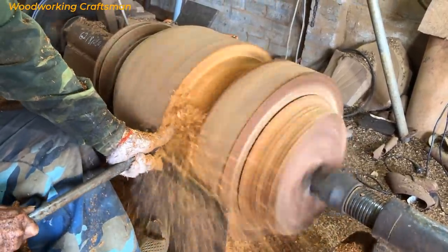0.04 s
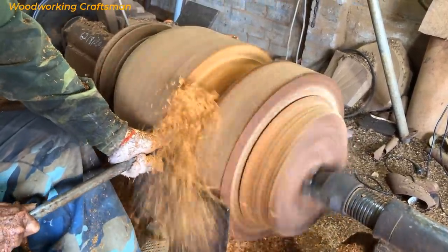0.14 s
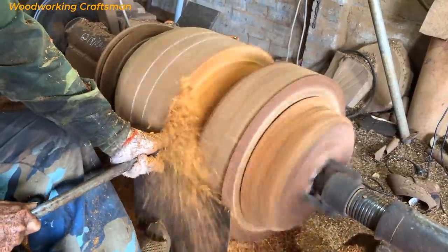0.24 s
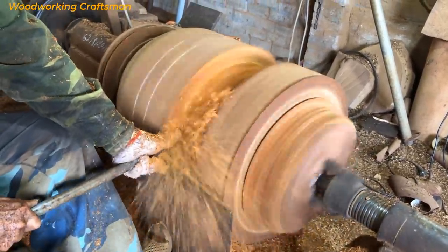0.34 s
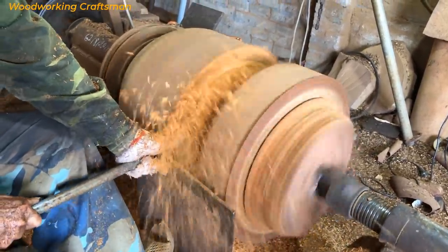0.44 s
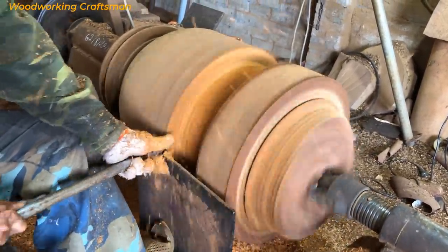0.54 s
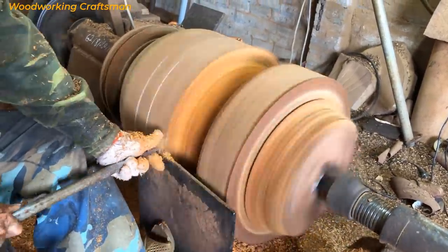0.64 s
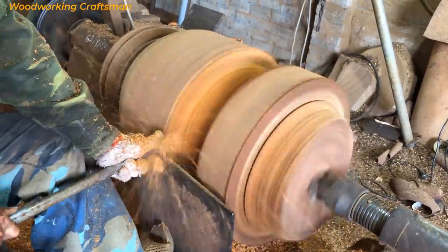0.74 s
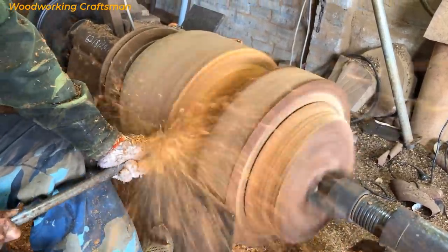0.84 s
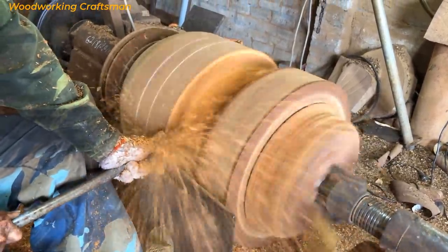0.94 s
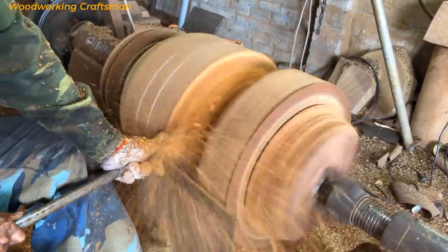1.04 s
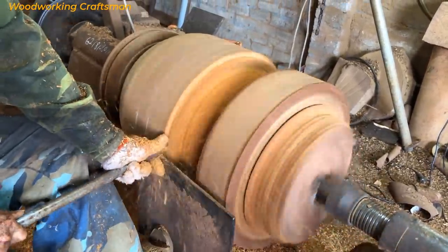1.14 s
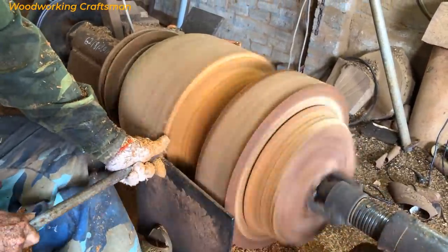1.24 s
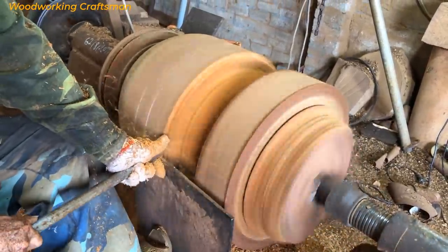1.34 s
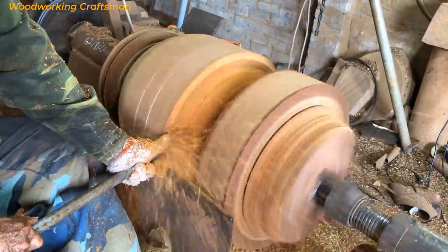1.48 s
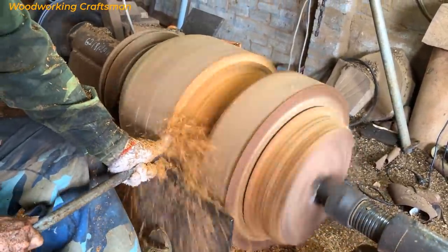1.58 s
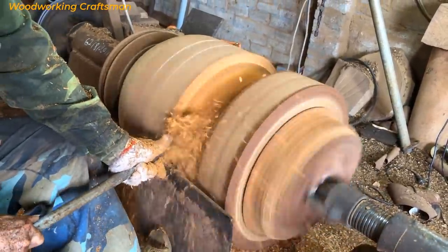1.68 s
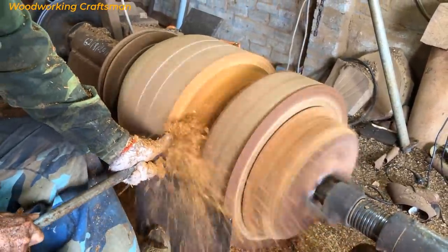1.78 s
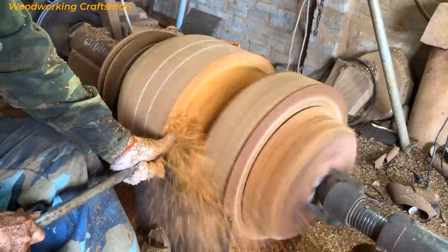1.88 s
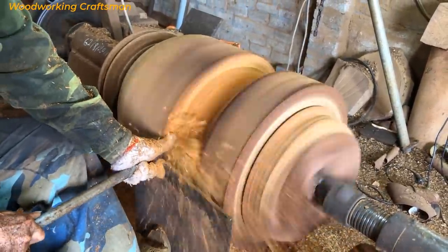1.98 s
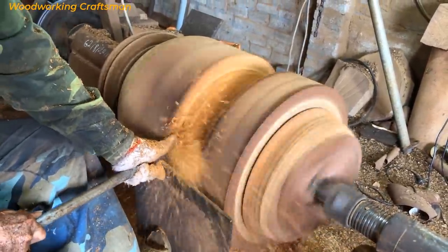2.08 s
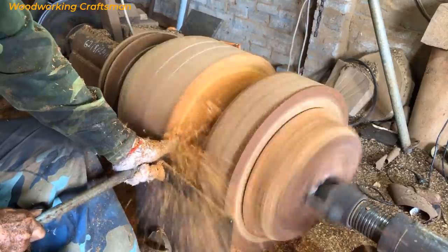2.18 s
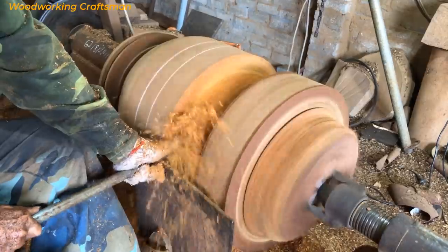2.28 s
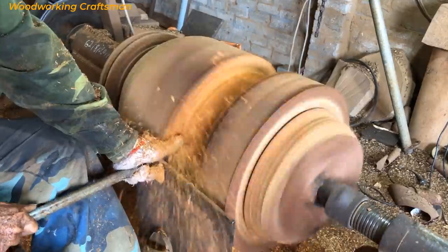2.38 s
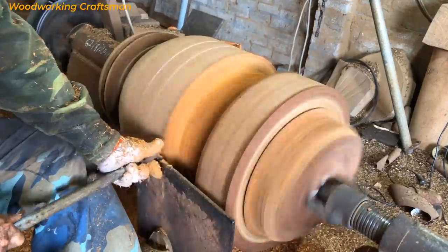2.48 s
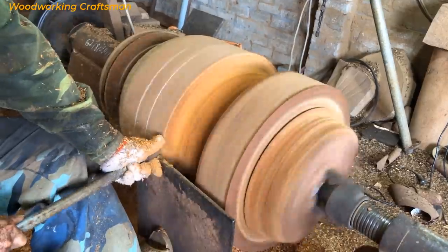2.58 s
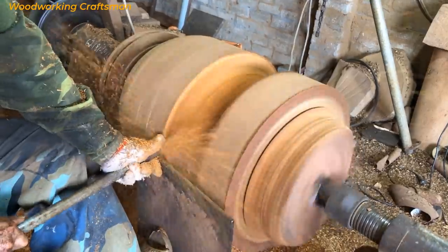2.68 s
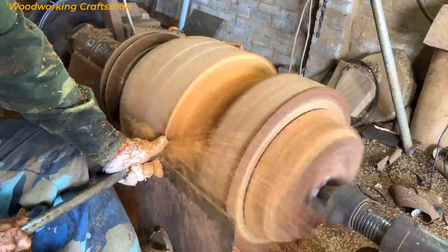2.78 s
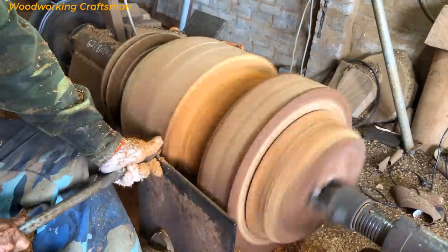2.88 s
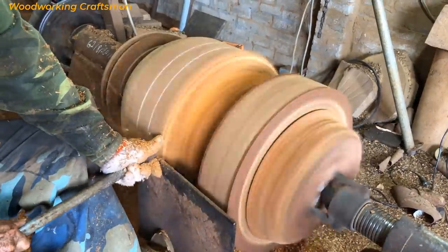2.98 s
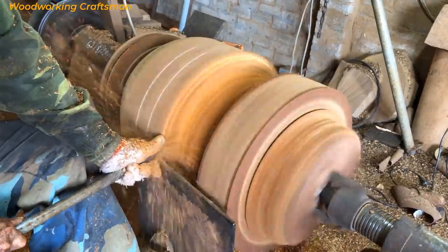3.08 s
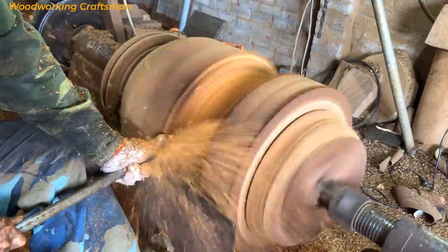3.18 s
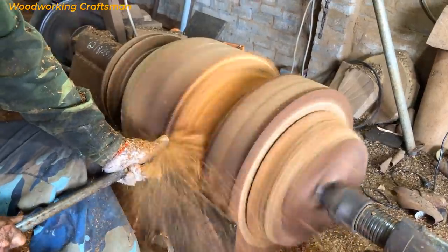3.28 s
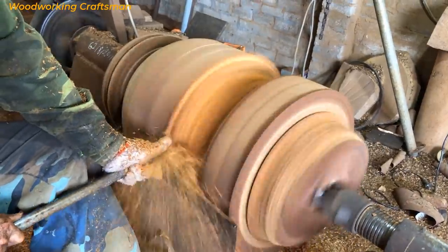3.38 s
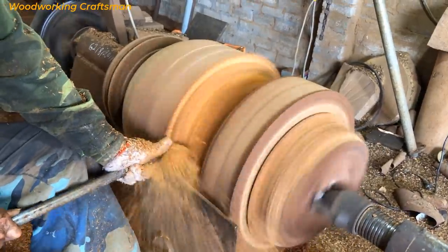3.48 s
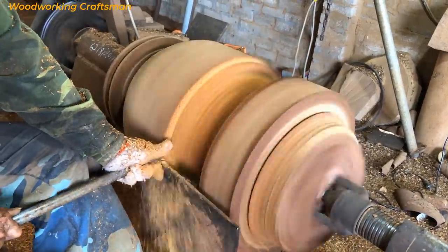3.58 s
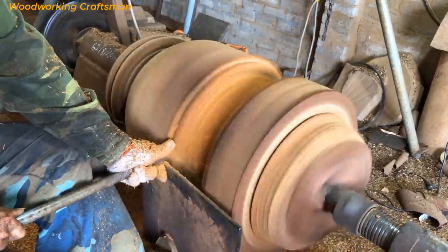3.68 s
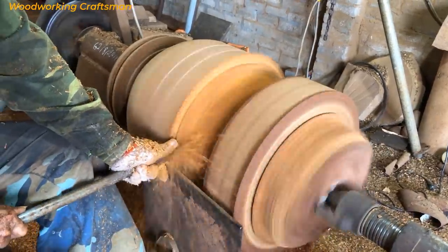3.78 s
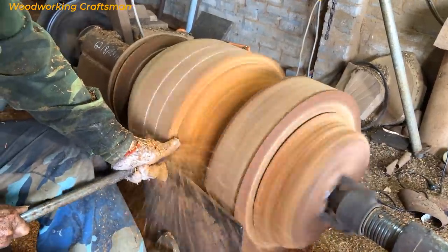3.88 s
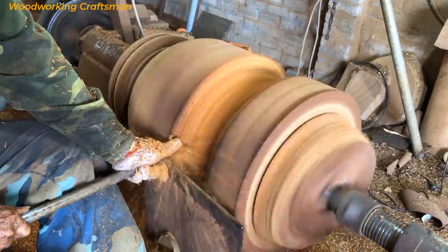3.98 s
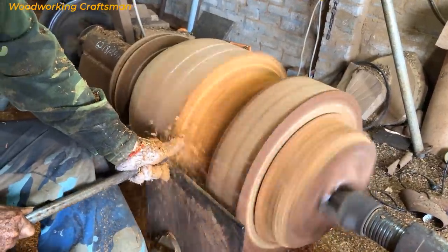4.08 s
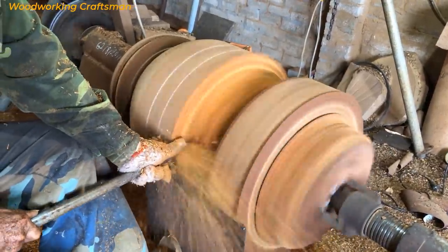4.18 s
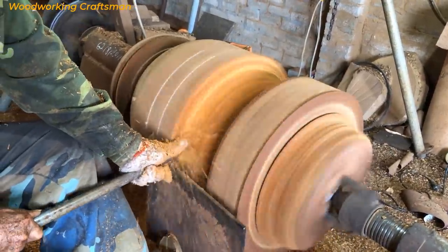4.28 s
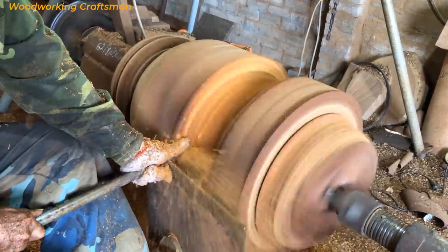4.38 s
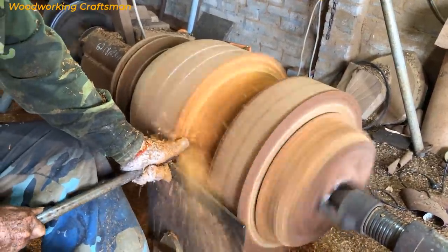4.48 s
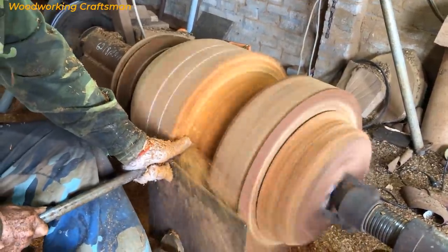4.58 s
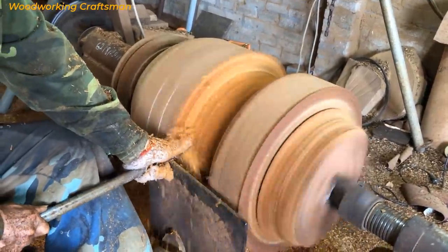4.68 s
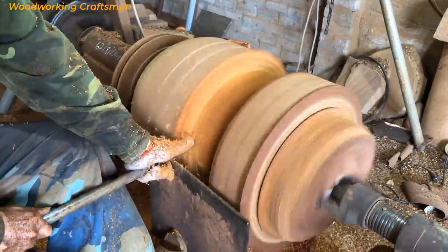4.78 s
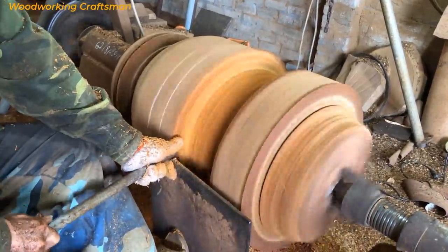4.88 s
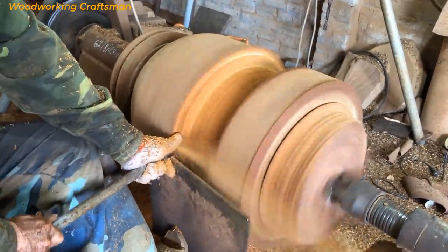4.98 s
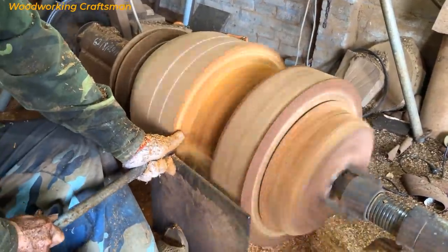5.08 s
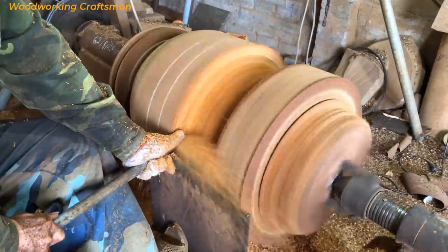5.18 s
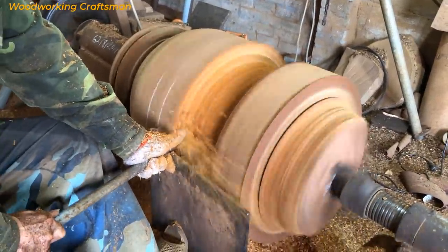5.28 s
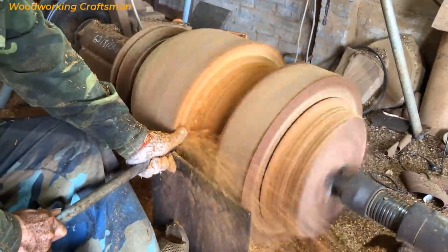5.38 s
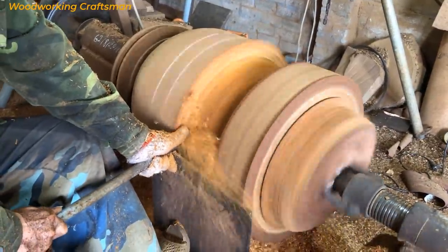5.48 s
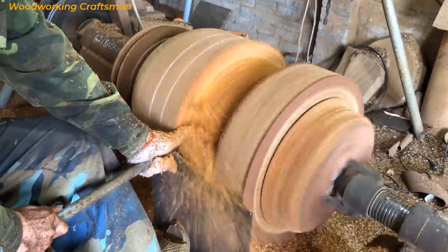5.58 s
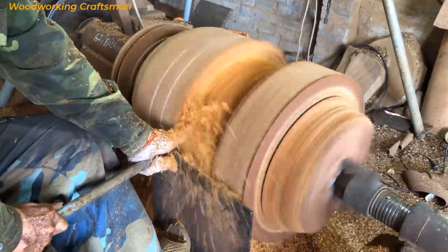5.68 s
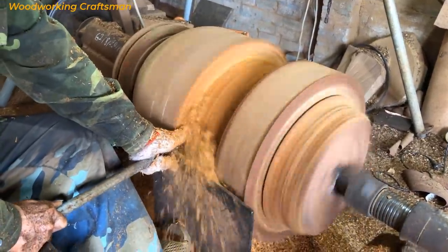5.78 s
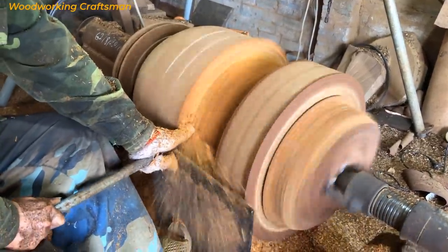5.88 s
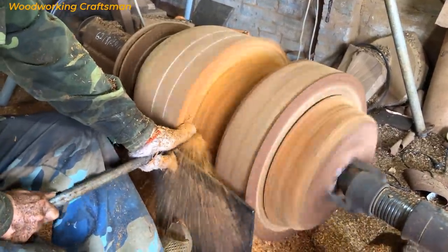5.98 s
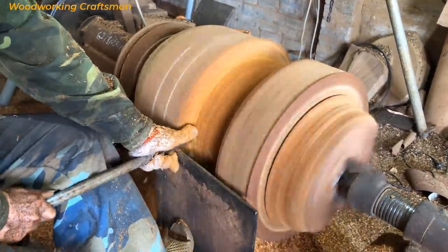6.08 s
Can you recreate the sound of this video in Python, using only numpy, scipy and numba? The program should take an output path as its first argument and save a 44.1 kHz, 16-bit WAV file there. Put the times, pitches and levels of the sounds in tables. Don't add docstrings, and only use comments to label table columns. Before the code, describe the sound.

Seven harsh scraping passes of a hand-held turning tool on rotating wood, metallic edged, with low drive hum and wind buffets on the microphone.

```python
import sys
import numpy as np
from scipy import signal
from scipy.fft import rfft, irfft, next_fast_len
from scipy.io import wavfile
from scipy.ndimage import uniform_filter1d
from numba import njit

SR = 44100
rng = np.random.default_rng(int(sys.argv[2]) if len(sys.argv) > 2 else 0)


def volts(x):
    e = np.asarray(x, float) / 20
    return 10 ** e


def store_wav(level_fs):
    pcm = np.round(np.clip(np.atleast_2d(level_fs), -1, 1) * 32767)
    wavfile.write(sys.argv[1], SR, pcm.T.astype(np.int16))


N = 270774
SKIM_HZ = 12710

# (edge touches [s], entry length [s], starts to lift [s], exit length [s], firmness on the rest [dB])
PASSES = [
    (-.1, .01, .576, .014, 1),
    (.714, .007, 1.179, .055, 0.5),
    (1.323, 0.0083, 2.439, .032, 0),
    (2.612, 0.051, 2.887, 0.05, -0.5),
    (2.957, 0.0046, 3.614, 0.021, 1),
    (3.728, 0.007, 4.835, .034, -3),
    (5.004, 0.047, 6.11, .05, -0.44),
]
# (time [s], level [dB])
BREEZE = [(0, -48), (.3, -46), (.42, -55), (.78, -51), (.86, -39.5), (1.75, -39), (2.3, -46), (2.64, -51),
          (2.72, -44), (3.18, -39.5), (3.29, -53), (3.4, -40.5), (4.46, -47.5), (4.6, -74), (4.7, -48.5),
          (5.2, -44.5), (5.4, -58.5), (5.9, -41.5)]


def level(x, db):
    return x * volts(db) / np.sqrt(np.mean(x ** 2))


@njit
def svf(x, hz, width):
    y, b, l = np.empty(len(x)), 0., 0.
    for i in range(len(x)):
        g, k = np.tan(np.pi * hz[i] / SR), width[i] / hz[i]
        v = (b + g * (x[i] - l)) / (1 + g * (g + k))
        b, l, y[i] = 2 * v - b, l + 2 * g * v, k * v
    return y


def band(x, hz, width):
    hz = np.clip(hz + np.zeros(N), 30, .45 * SR)
    width = width + np.zeros(N)
    return svf(svf(x, hz, width), hz, width)


def walk(rate):
    hold = int(SR / rate)
    steps = np.repeat(rng.standard_normal(N // hold + 1), hold)
    return 1.46 * uniform_filter1d(uniform_filter1d(steps, hold), hold)[:N]


def shape(x, response):
    size = next_fast_len(N + SR)
    hz = np.arange(size // 2 + 1) * SR / size
    return irfft(rfft(x, size) * response(hz), size)[:N]


def hand(t):
    # (time [s], force [dB], tearing pitch [Hz], fineness [dB])
    plunges = [
        [(0, -15.5, 11000, -13), (.348, -18, 9860, -13.5), (.576, -21.5, 10640, -1)],
        [(1.328, -19.5, 12700, -9), (1.476, -20.5, 12900, -12), (1.68, -16, 12600, -10),
         (1.928, -16, 10500, -11), (2.16, -18, 10000, -14), (2.422, -21.5, 10600, -4), (2.455, -22, 10500, -4)],
        [(3.736, -17.5, 13050, -24), (3.82, -20, 12420, -19), (3.972, -18.5, 12300, 3.5),
         (4.282, -16.5, 11330, -6.5), (4.58, -23, 10300, -2), (4.82, -23, 11200, -5)],
        [(5.056, -24, 12450, -2), (5.236, -19.5, 12430, 2), (5.626, -16, 10100, -9.5),
         (5.83, -20.5, 9900, -10.5), (6.065, -27.5, 10140, -3), (6.1, -19.5, 12300, -14),
         (6.14, -23, 11200, -13)],
    ]
    # (time [s], force [dB], fineness [dB])
    skims = [
        [(.72, -34, -11), (.86, -22, -14), (1.184, -22.5, -12)],
        [(2.668, -26, -15), (2.8, -22, -10), (2.862, -25.5, -10), (2.875, -31.5, -12)],
        [(2.962, -34, -7), (3.002, -19.5, -14), (3.36, -20.5, -11), (3.614, -20.5, -2)],
    ]
    skim_rows = [[(s, db, SKIM_HZ, fine) for s, db, fine in skim] for skim in skims]
    s, *columns = np.transpose(np.concatenate(sorted(plunges + skim_rows)))
    return [np.interp(t, s, column) for column in columns]


def contact(t):
    rows = np.transpose(PASSES)
    touch, entry, lift, leave, firm_db = rows[:, np.searchsorted(rows[0], t) - 1]
    entering_db = -21 * np.clip(1 - (t - touch) / entry, 0, 1)
    gone = np.clip((t - lift) / leave, 0, None)
    lifting_db = -22 * np.minimum(gone, 1) ** 1.26 - 36 * np.clip(gone - 1, 0, 4)
    settling_db = -2.5 * np.exp(-(t - touch) / 0.058)
    return entering_db + lifting_db, firm_db + settling_db


def chatter_db(t):
    # (starts [s], full [s], rate [Hz], depth [dB], time of a crest [s])
    lobes = [
        (0, .3, 19.4, 1.5, .419),
        (.8, .9, 32.9, 1.6, 1.005),
        (.8, .9, 19.6, .9, .983),
        (1.85, 2.25, 19.7, 2.5, 2.265),
        (4.05, 4.45, 33.1, 2.5, 4.574),
        (4.2, 4.6, 19.8, 2.3, 4.703),
        (5.5, 5.85, 19.6, 2.6, 5.947),
    ]
    touches = np.transpose(PASSES)[0]
    total_db = np.zeros(N)
    for start, full, hz, db, crest in lobes:
        same_pass = np.searchsorted(touches, t) == np.searchsorted(touches, start)
        depth = db * np.interp(t, [start, full], [0, 1]) * same_pass
        angle = 2 * np.pi * hz * (t - crest)
        total_db += depth * (np.cos(angle) - 0.21 * np.cos(2 * angle))
    return total_db


def skips_db(t):
    # (time [s], force change [dB], length [ms])
    skips = [(.722, 7, 3.6), (.75, 0, 10), (.818, 6.5, 6.2), (1.238, 11, 4), (1.332, 3.5, 2.7),
             (1.344, -17, 6.9), (1.365, -5.5, 6.8), (2.415, -1, 5.3), (2.618, 9, 4.9), (2.665, 4, 5.4),
             (3.657, 4, 3.4), (3.72, 16, 4.4), (3.735, 1, 2.8), (3.742, -13, 6.1), (3.776, -3, 5.1),
             (4.768, -1.5, 11), (5.017, -6, 3.6), (5.028, 3.5, 4.5), (5.045, -18, 5.1), (5.075, -14, 3.6)]
    return sum(db * np.exp(-((t - at) * 1000 / ms) ** 2) for at, db, ms in skips)


def fibres(scatter_db, flicker_db):
    uneven = np.minimum(rng.exponential(size=N), 5)
    sizes = volts(scatter_db * uneven + flicker_db * walk(90))
    return level(rng.standard_normal(N) * sizes, 0)


def tearing(hz, deep, heavy):
    breaks = fibres(scatter_db=4.0, flicker_db=0.25)
    pitched = band(breaks, hz * (1 + 0.008 * walk(14)), 3300 - 900 * heavy)
    hiss = band(breaks, 11300 - 900 * deep, 5600)
    return level(pitched, -6.0) + volts(-2.8 * deep) * level(hiss, -7.5)


def shank_ring(load):
    breaks = fibres(scatter_db=5.0, flicker_db=0.96)
    return level(band(breaks, 7550 - 900 * load, 1080), -7)


def rest_ring(load, heavy):
    rub = fibres(scatter_db=4.0, flicker_db=1.13)
    light = band(rub, 3680, 1040) + 1.17 * band(rub, 5210, 1980) + 0.34 * band(rub, 4390, 3900)
    middle = band(rub, 4430, 1400)
    ring = (1 - 0.59 * load) * light + (0.15 + 0.71 * heavy + 1.35 * load) * middle
    ring = volts(-5) * ring / np.sqrt(uniform_filter1d(ring ** 2, size=4000))
    thud = level(band(fibres(scatter_db=0.0, flicker_db=-1.0), 1730, 1470), -20.0)
    return ring + thud


def shaving_dust(deep):
    breaks = fibres(scatter_db=4.0, flicker_db=0.2)
    return level(band(breaks, 15300 - 650 * deep + 120 * walk(3), 3600 + 1200 * deep), -2.6)


def tool(f):
    # (frequency [Hz], width [Hz], level over the bare tearing [dB])
    modes = [(1395, 73, 15), (1750, 67, 11), (1980, 81, 11.5), (2820, 37, 8), (3420, 73, 7.5),
             (4090, 235, 12), (4347, 50, 9), (5264, 87, 7.5), (6080, 67, 7), (6760, 240, 7),
             (7160, 210, 8.5), (7360, 60, 7.5), (8240, 84, 8.5), (9150, 300, 5), (9510, 220, 5.5),
             (8960, 150, 2), (10240, 120, -14), (11200, 160, 5), (11900, 130, 6.5), (12450, 330, 7),
             (13250, 290, 4.5), (13600, 350, 5), (14460, 400, 5.5), (15600, 220, -10)]
    return 1 + sum((volts(db) - 1) * 1j * w * f / (hz ** 2 - f ** 2 + 1j * w * f) for hz, w, db in modes)


def gouge(t):
    hand_db, hz, dust_db = hand(t)
    edge_db, firm_db = contact(t)
    hover_db = -60 + 5 * walk(60)
    db = np.maximum(hand_db + edge_db, hover_db)
    hz = hz + (SKIM_HZ - hz) * np.clip(-edge_db / 30 - .5, 0, 1)
    bounce_db = chatter_db(t)
    force = volts(db + bounce_db + skips_db(t) + .5 * walk(35))

    deep = np.clip((12400 - hz) / 2400, 0, 1)
    slow = np.exp(-1 / (0.37 * SR))
    late = signal.lfilter([1 - slow], [1, -slow], deep, zi=[.15])[0]
    late = late * np.minimum(3 * uniform_filter1d(deep, size=6000), 1)
    heavy = np.clip((db + 20.5) / 3, 0, 1)

    shank_db = -10.5 + 7.5 * deep - 0.22 * (dust_db + 9) + 1.02 * firm_db
    shank_db = shank_db + 0.81 * late * np.clip(-20 - hand_db, 0, 8)
    rest_db = -35 + 6 * late - 0.13 * (dust_db + 6.5) + firm_db
    rest_db = rest_db - np.maximum(hand_db, -23 - 6 * late)
    load = np.clip((rest_db + 13.0 + 5 * late) / 8, 0, 1)

    parts = tearing(hz, deep, heavy) + volts(shank_db) * shank_ring(load)
    parts = parts + volts(rest_db - 0.93 * bounce_db) * rest_ring(load, heavy)
    parts = parts + volts(dust_db + 0.26 * bounce_db) * shaving_dust(deep)
    return shape(force * parts, tool)


def shed(x, t60, wet_db):
    u = np.arange(SR // 3) / SR
    decay = np.exp(-np.log(1000) * u / t60) * (u > .004)
    tail = rng.standard_normal(len(u)) * decay
    return x + volts(wet_db) * signal.fftconvolve(x, tail / np.sqrt(np.sum(tail ** 2)))[:N]


def lathe():
    # (frequency [Hz], density [dB per Hz])
    spectrum = [
        (59, -42),
        (100, -19),
        (282, -5),
        (498, -3.5),
        (1020, -9.5),
        (2330, -9.5),
        (2760, -12),
        (15600, -25.5),
    ]
    # (frequency [Hz], width [Hz], level [dB])
    resonances = [
        (216, 61, -63.5),
        (617, 130, -52.5),
        (890, 90, -55.5),
    ]
    hz, db = np.transpose(spectrum)
    hum = shape(rng.standard_normal(N), lambda f: volts(np.interp(np.log(f + 1), np.log(hz), db)))
    rings = np.zeros(N)
    for f, width, ring_db in resonances:
        rings += level(band(rng.standard_normal(N), f, width), ring_db) * volts(2.0 * walk(8.3))
    return level(hum, -44) * volts(1.0 * walk(19)) + rings


def puffs():
    # (time [s], level [dB], length [ms], pitch [Hz])
    broad = [(.149, -33.5, 22, 310), (.294, -19, 18.5, 640), (.85, -20.5, 26, 600), (1.108, -29, 22, 687),
             (1.138, -21, 19, 760), (1.168, -19, 23, 727), (1.198, -21.5, 22.5, 513),
             (1.316, -27.5, 12, 453), (1.453, -28, 34, 286), (1.538, -18, 19, 970), (1.577, -19, 20, 870),
             (1.653, -21.5, 21, 720), (1.781, -26, 47, 470), (1.843, -24, 17, 610), (2.476, -26.5, 46, 815),
             (2.715, -16.5, 20.4, 1050), (2.765, -28, 38, 640), (2.841, -26, 39, 600),
             (2.937, -22, 21.6, 970), (3.155, -26, 23, 760), (3.343, -22.5, 23, 1050),
             (3.408, -20.5, 17, 560), (3.458, -23, 22, 890), (3.76, -24.5, 25.6, 905),
             (3.889, -25, 45, 875), (4.063, -28.5, 49, 1010), (4.427, -25, 28, 1010), (4.712, -25, 25, 855),
             (5.019, -25.5, 28, 770), (5.235, -23, 34, 890)]
    # (time [s], level [dB], pitch [Hz])
    flicks = [(.275, -16, 950), (.905, -23, 420), (0.963, -23, 660), (1.284, -23, 527), (1.482, -27, 730),
              (1.552, -18, 940), (1.824, -23, 690), (2.146, -24, 413), (2.224, -22.5, 700),
              (2.59, -27.5, 1100), (2.894, -21.5, 810), (2.923, -19.5, 1170), (2.995, -25.5, 690),
              (3.386, -23, 520), (3.426, -20.5, 1090), (3.489, -18.5, 716), (3.508, -19.5, 870),
              (3.828, -22.5, 930), (3.935, -25, 810), (4.265, -24.5, 1070), (4.295, -25, 1050),
              (4.39, -23, 1180), (4.405, -22, 920), (4.792, -24.5, 775), (4.843, -23, 930),
              (4.869, -32, 870), (4.891, -28.5, 720), (4.937, -25.5, 990), (5.132, -24, 800),
              (5.659, -27.5, 970)]
    # (time [s], level [dB])
    wisps = [(.069, -33.5), (.326, -34), (.349, -38), (.883, -41), (.924, -31), (1.082, -40), (1.222, -30),
             (1.989, -30), (2.093, -29), (2.243, -31), (2.304, -33.5), (2.524, -30), (3.061, -34),
             (3.199, -30.5), (3.603, -32), (3.785, -27.5), (3.97, -29), (4.022, -29), (4.129, -27.5),
             (4.212, -31.5), (5.447, -35), (4.374, -32), (4.49, -29.5), (4.765, -29), (5.045, -33),
             (5.101, -26), (5.855, -29), (5.939, -28.5), (5.993, -34), (6.042, -37)]
    strays_per_s = 14
    chance = rng.random((int(strays_per_s * N / SR), 4)).T
    at = (np.arange(len(chance[0])) + chance[0]) / strays_per_s
    db = np.interp(at, *np.transpose(BREEZE)) + 8 + 2 * (2 * chance[1] - 1)
    ms = 15.7 * (0.55 + 0.79 * chance[2])
    hz = 647 * (0.5 + 0.39 * chance[3])
    fixed_length = [(s, d, 10.1, f) for s, d, f in flicks] + [(s, d, 16.5, 760) for s, d in wisps]
    return sorted(broad + fixed_length + list(zip(at, db, ms, hz)))


def buffeting(t):
    s, db, ms, hz = np.transpose(puffs())
    swell = np.zeros(N)
    for at, gain, length in zip(s, volts(db), ms / 1000):
        near = slice(max(int((at - 2 * length) * SR), 0), int((at + 3 * length) * SR))
        u = (t[near] - at) / length
        side, power = np.where(u < 0, .45, .62), np.where(u < 0, 5, 2.5)
        swell[near] += gain * np.exp(-np.abs(u / side) ** power)
    puff_hz = np.interp(t, s, hz)
    pitch = puff_hz * np.clip(swell / volts(np.interp(t, s, db)), .1, 1.3) ** 0.15
    eddies = rng.standard_normal(N) * volts(3.5 * walk(320) + 2.4 * walk(1000))
    body = svf(svf(eddies, .86 * pitch, 1.6 * pitch), 1.1 * pitch, 2.4 * pitch)
    body = signal.sosfilt(signal.butter(3, 3200, fs=SR, output="sos"), body)
    even = np.sqrt(uniform_filter1d(body ** 2, size=700))
    wake = volts(-13.5) * uniform_filter1d(swell * (600 / puff_hz) ** 2.6, size=1800)
    calm = volts(np.interp(t, *np.transpose(BREEZE)) - 4)
    low_air = volts(2.4 * walk(28.08)) * (calm + wake)
    rumble = level(band(rng.standard_normal(N), 200, 420), 1.2)
    return volts(-1.5) * swell * body / even + low_air * rumble


def scene():
    t = np.arange(N) / SR
    cut = shed(gouge(t), t60=.12, wet_db=-19)
    return (cut + lathe() + buffeting(t))[None]


def band_limit(x):
    return signal.sosfilt(signal.butter(12, 17000, fs=SR, output="sos"), x)


def record(dry):
    wind_cut = signal.butter(3, 150, "high", fs=SR, output="sos")
    x = signal.sosfilt(wind_cut, dry) + volts(-44.0) * dry
    x = 0.82 * np.tanh(x / 0.87)
    top_cut = signal.ellip(10, .2, 60, 15650, fs=SR, output="sos")
    x = signal.sosfilt(top_cut, x)
    return band_limit(x)


dry = scene()
out = record(dry)
store_wav(out)
```